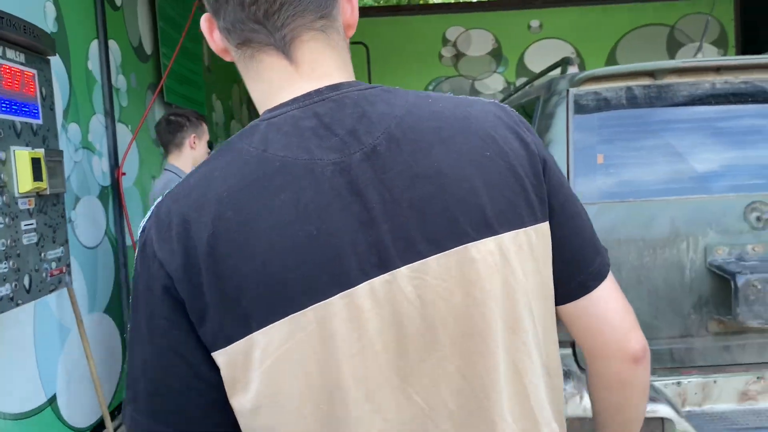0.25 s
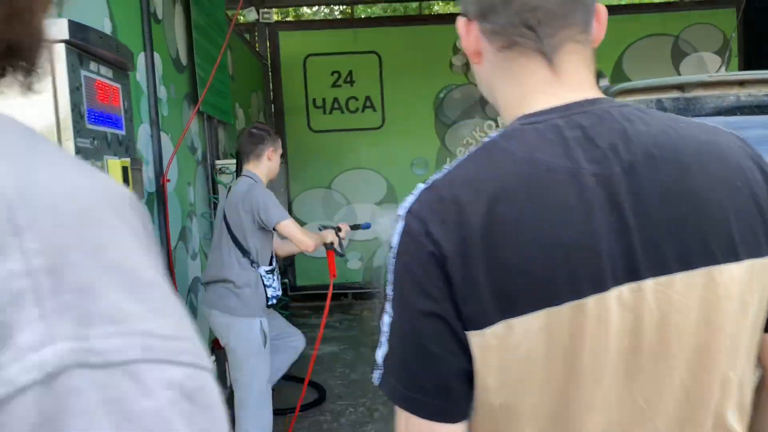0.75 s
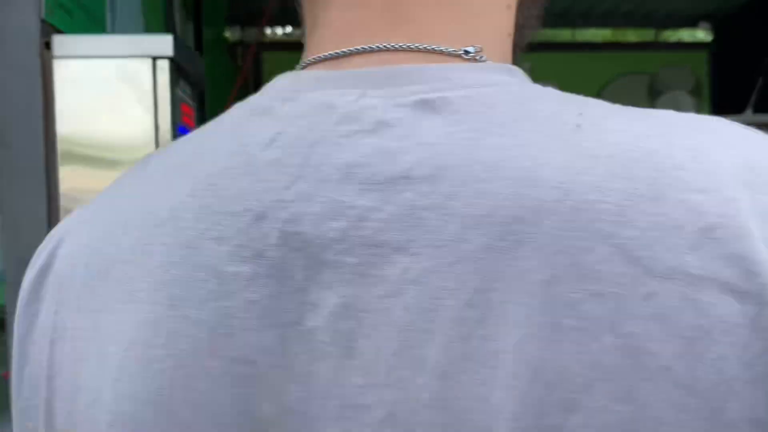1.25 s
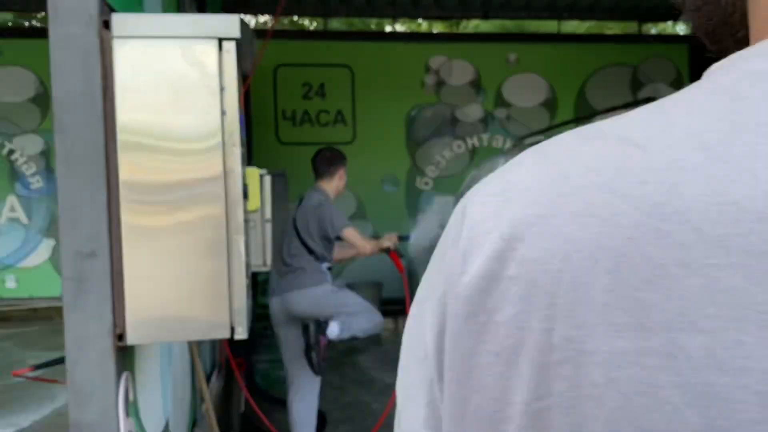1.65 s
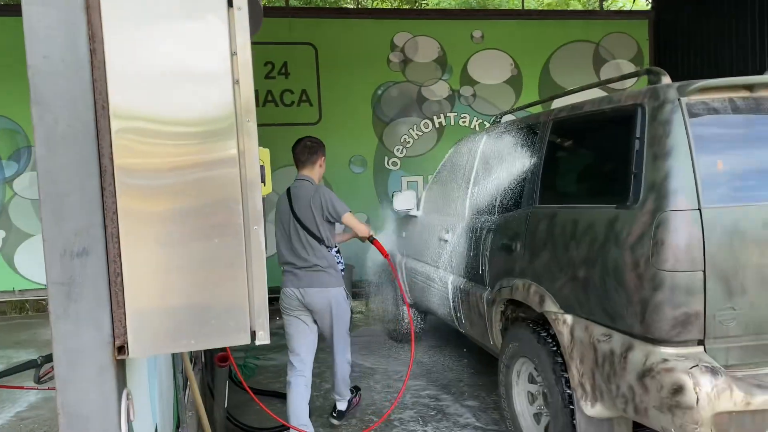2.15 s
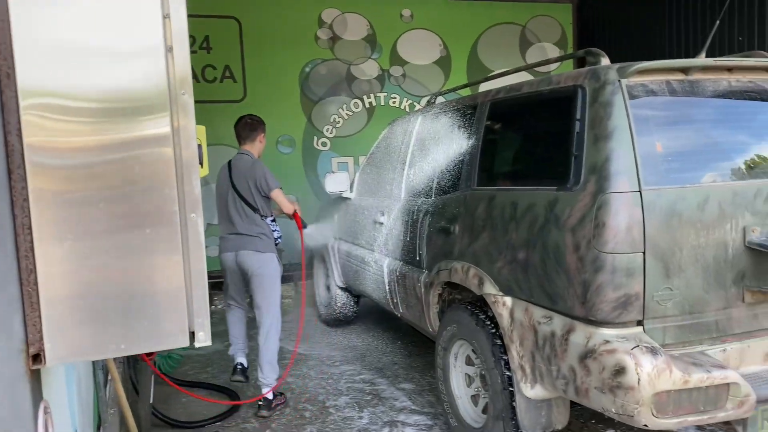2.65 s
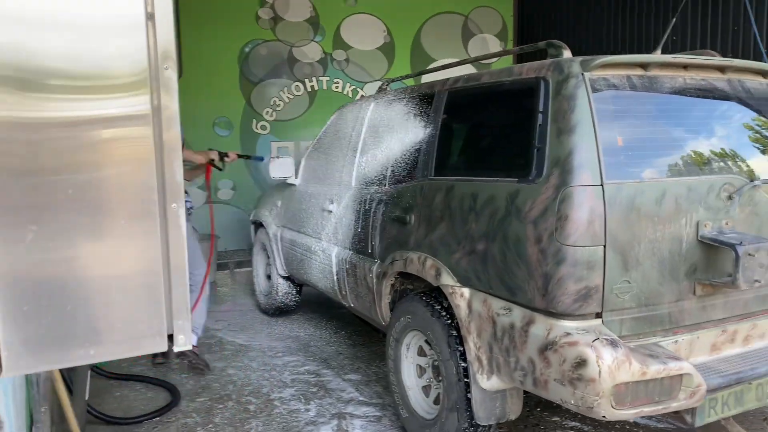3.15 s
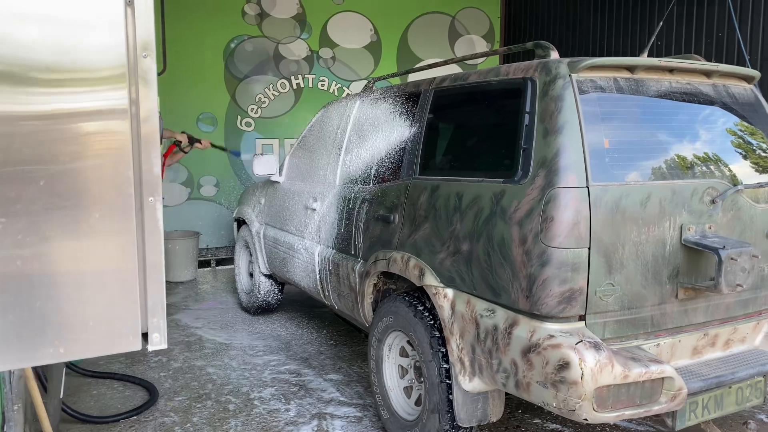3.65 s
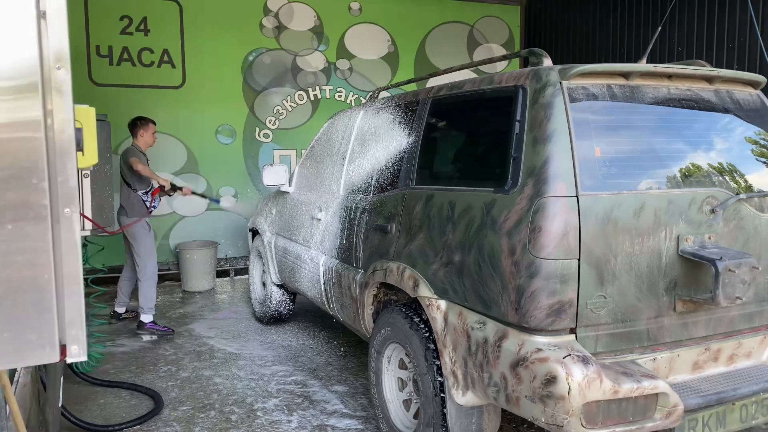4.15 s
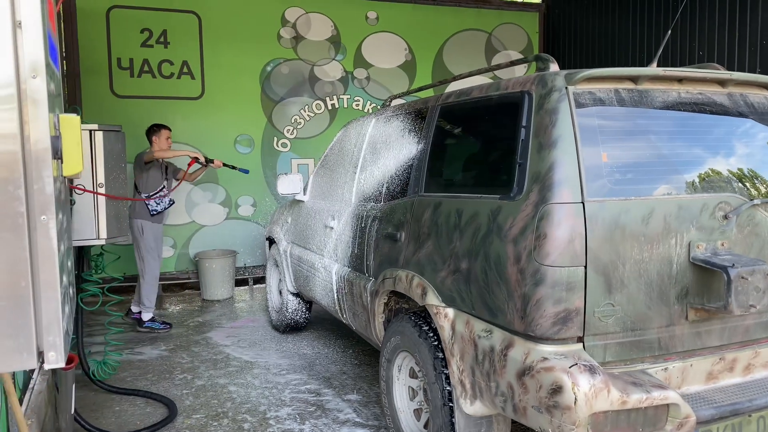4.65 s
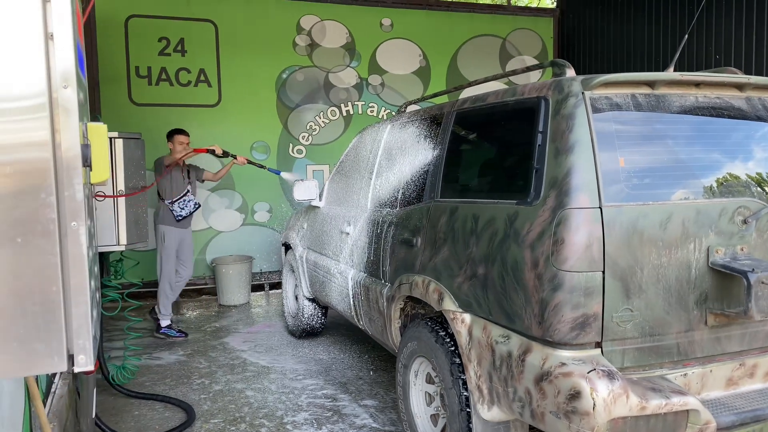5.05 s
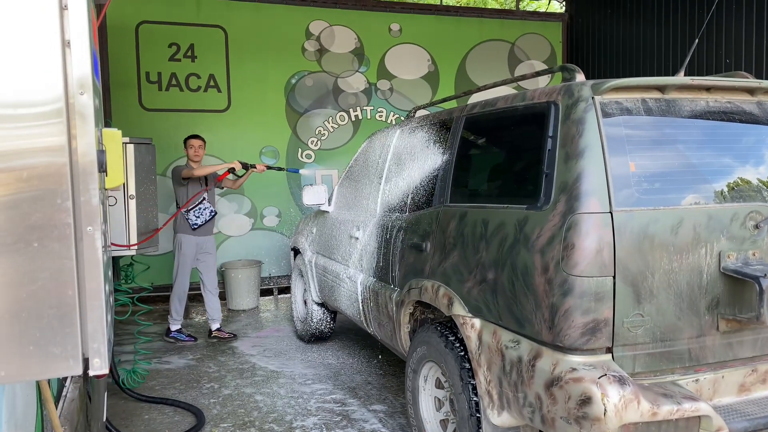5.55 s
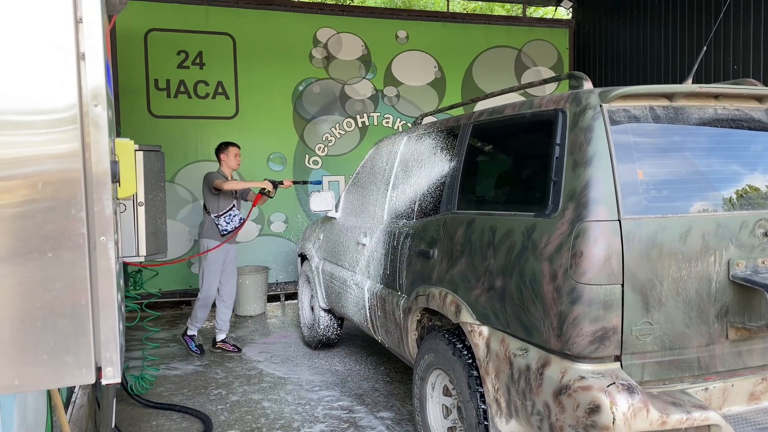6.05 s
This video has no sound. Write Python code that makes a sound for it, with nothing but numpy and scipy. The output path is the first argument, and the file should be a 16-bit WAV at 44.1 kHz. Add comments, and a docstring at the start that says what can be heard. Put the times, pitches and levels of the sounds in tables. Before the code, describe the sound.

Heard from a few metres away in a half-open, reflective wash bay: a pressure lance hisses foam onto bodywork, slightly left, its echoes slowly shifting. Beneath it a pump throbs and knocks rapidly, water rushes low in the hose, and a hollow mid-pitched hoot wobbles. Each trigger release drops to hum, distant airy hiss and little gliding groans before the spray bursts back.

```python
"""A foam lance sprays a car in a self-service wash bay: filtered noise hisses on the left, with shifting echoes.
Dull gliding thuds open the scene; the trigger is let go at 0.76 s, held from 1.13 to 4.5 s and 4.84 to 5.85 s,
and pulled once more at 6.3 s. While it is held, noise drops spatter as foam, resonators hoot as the foam barrel
and shaft harmonics throb and knock as a three-plunger pump. At each release the line groans in short glides,
the pump sags and fades, and the motor's hum stays."""
import sys
import numpy as np
from scipy import signal
from scipy.fft import rfft, irfft
from scipy.io import wavfile

SR = 44100
rng = np.random.default_rng(int(sys.argv[2]) if len(sys.argv) > 2 else 0)


def dump(signal):
    """Clip the signal to [-1, 1] and save it as 16-bit WAV at the path in sys.argv[1]."""
    limited = np.clip(np.atleast_2d(signal).T, -1, 1)
    pcm = np.round(limited * 32767).astype(np.int16)
    wavfile.write(sys.argv[1], SR, pcm)


N = 278712
TIME_S = np.arange(N) / SR
BINS_HZ = np.fft.rfftfreq(N, 1 / SR)

# Motor hum, beating with the plungers' throb: (time [s], lower line [dB], upper line [dB])
HUM_LEVELS = [(0.3, -49, -51), (1.1, -45, -49), (1.65, -45, -40), (3.1, -44, -49), (4.7, -47, -41),
              (5.5, -51, -45), (6.15, -53, -38.5), (6.3, -54, -45)]
# Hum lines: (lower, upper) [multiples of shaft speed]
HUM_LINES = (2, 4)
# Low wash of the surroundings: (frequency [Hz], density [dB per Hz, relative])
WASH_SPECTRUM = [(25, -35), (50, 6), (100, 0), (200, 0), (420, -3.5), (600, -16), (1100, -28), (4500, -60)]
# Low wash, louder around the pauses: (time [s], level [dB])
WASH_LEVELS = [(1.0, -40.5), (3.2, -43.5), (4.75, -37), (5.5, -43), (6.1, -36.5), (6.3, -36.5)]
# Distant hiss outside the bay: (frequency [Hz], density [dB per Hz, relative])
AIR_SPECTRUM = [(300, -11), (700, 0), (1100, -4), (2500, -5), (4500, -12), (8000, -19), (16000, -45)]
# Dull bumps: (start [s], length [s], start pitch [Hz], end pitch [Hz], level [dB])
BUMP_GLIDES = [(0.019, 0.057, 71, 48, -29), (0.1, .12, 58, 57, -33), (0.04, 0.061, 116, 107, -26),
               (0.0068, 0.11, 196.6, 182, -28), (.12, 0.061, 129, 113, -30), (0.087, 0.2, 354, 310, -35.5),
               (.02, 0.091, 400, 303, -32.5), (0.21, 0.085, 115, 112, -39)]

# Trigger pulls: (opens [s], shuts [s], pump unloads [s], lance fill time [s], fade pace [1 = usual],
# spit level [dB], spit decay [s])
TRIGGER_PULLS = [(-1, 0.76, 0.755, 0.01, 0.93, -40, 0.05), (1.133, 4.505, 4.62, 0.078, 1.05, -51, 0.12),
                 (4.838, 5.845, 5.98, 0.008, 0.9, -28, 0.06), (6.307, 7, 7.1, 0.07, 1, -22, 0.045)]
OPENS_S, SHUTS_S, UNLOADS_S, FILL_S, FADE_PACE, SPIT_DB, SPIT_DECAY_S = np.transpose(TRIGGER_PULLS)

# Water rush in hose and lance: (frequency [Hz], density [dB per Hz, relative])
RUSH_SPECTRUM = [(25, -31), (45, -21), (70, 3), (130, -2), (200, 1), (300, 4), (420, 1.5), (600, -3),
                 (900, -2.5), (2000, -30)]
# Water rush: (time [s], level [dB])
RUSH_LEVELS = [(0, -28.5), (0.45, -34.5), (1.6, -36.5), (2.9, -40), (3.6, -36), (4.3, -42.5), (5.6, -34)]
# Left-right difference of jet and water: (frequency [Hz], left above right [dB])
LEFT_EXCESS = [(300, -0.5), (560, 4.5), (1100, 3), (1800, 0.5), (2900, 3), (4400, 5), (7500, 4), (10000, 0)]

# Loaded shaft: (time [s], speed [Hz])
SHAFT_SPEED = [(0, 23.85), (1.6, 23.885), (2.5, 23.87), (4.3, 23.835), (5.5, 23.82)]
# Casing knock: (order [multiple of shaft speed], level [dB, relative])
KNOCK_ORDERS = [(7, -3.5), (8, 3), (9, 2.5), (10, 1), (11, -4.5), (12, -2), (13, -11.5), (14, -9.5),
                (16, -12), (19, -12.5), (22, -13.5)]
# Knock along the way through the bay: (time [s], level [dB], tilt [dB per order], echo blur [rad])
KNOCK_COURSE = [(0.15, -30, -1, 2), (0.45, -34, -0.5, 1.1), (0.68, -31.5, -0.9, 1.5), (1.25, -31, 1, 0.69),
                (1.45, -31.5, -0.5, 0.47), (2.4, -30.5, 0.5, 0.98), (3.1, -31.5, -0.5, 1.1),
                (3.8, -33, 0.5, 1.3), (4.35, -33.5, -0.5, 0.85), (5.1, -34.5, 0.3, 1.3),
                (5.8, -36.5, -0.5, 1.1)]
# Motor drone along standing waves in the bay, one table per line: (time [s], level [dB])
DRONE_LOW_LEVELS = [(0, -34), (0.5, -41.5), (1.7, -40.5), (3.2, -53), (4.3, -45), (5.8, -45)]
DRONE_MID_LEVELS = [(0.1, -48), (0.58, -36.5), (0.8, -48), (1.5, -47), (1.9, -41.5), (2.6, -41), (3.0, -44),
                    (3.8, -43.5), (4.5, -46.5), (5.6, -46.5)]
DRONE_HIGH_LEVELS = [(0.1, -44), (0.45, -42.5), (1.4, -52), (2.4, -51), (3.2, -53), (3.9, -43.5),
                     (4.6, -53.5), (5.8, -46.5)]
# Drone lines: (low, mid, high) [multiples of shaft speed]
DRONE_LINES = (5, 17, 20)

# Line groans under pressure changes: (start [s], length [s], start pitch [Hz], end pitch [Hz], level [dB])
GROAN_GLIDES = [(0.851, 0.2, 428, 408, -45.5), (1.125, .14, 192, 189, -41), (4.501, 0.068, 440, 460, -38.5),
                (4.54, .07, 210, 110, -34), (4.84, 0.13, 190.4, 185, -37), (5.87, 0.13, 660, 640, -43),
                (5.886, 0.046, 436, 462, -40), (5.901, 0.163, 428.4, 408, -35.5),
                (5.988, 0.086, 257, 302, -35), (6.06, .08, 338, 330, -51), (6.081, 0.054, 400, 420, -41),
                (6.11, .11, 511, 464, -43), (6.165, 0.067, 354, 348, -38.5),
                (6.277, 0.087, 430, 414, -37.5), (6.304, 0.032, 1083, 500, -32)]
# Valve spit: (frequency [Hz], density [dB per Hz, relative])
SPIT_SPECTRUM = [(200, -18), (500, -3), (850, 8), (1400, 2.5), (2800, -3), (4500, -1.5), (8000, -9),
                 (16000, -15)]

# Foam spatter: (frequency [Hz], density [dB per Hz, relative])
FOAM_SPECTRUM = [(1500, -18), (4000, -5), (6500, 1.5), (8500, -0.5), (11000, 3), (13000, -0.5), (16000, -7)]
# Foam fan sweeping over a near panel: (middle [s], length [s], boost [dB])
PANEL_SWEEPS = [(1.49, 0.16, 3.5), (1.96, 0.074, 5), (2.992, 0.067, 4), (3.296, 0.1, 9), (3.488, 0.1, 1.5),
                (3.77, 0.09, 9.5), (4.042, 0.16, 7), (4.192, 0.13, 7), (4.368, 0.076, 5.5), (5.07, 0.12, 5),
                (5.8, 0.27, 2.5), (6.09, 0.12, 14)]

# Barrel hoot: (time [s], pitch [Hz], strength [dB; halved for the broad band])
HOOT_COURSE = [(0, 751, 5), (0.16, 702, -2), (0.27, 763, -1.5), (0.48, 693, -1), (0.56, 780, -5),
               (0.75, 764, -5), (1.35, 725, 4), (1.55, 705, 3), (1.69, 745, 5.5), (1.85, 738, -5),
               (2.0, 724, 3), (2.22, 724, 1), (2.32, 704, 1), (2.48, 705, 4.5), (2.6, 755, -5),
               (2.67, 710, -7), (2.75, 720, 6.5), (2.85, 752, -3), (2.97, 732, 2), (3.3, 713, 0),
               (3.55, 717, -1), (4.15, 720, 1.5), (4.5, 705, -0.5), (4.95, 725, -3), (5.2, 716, 0),
               (5.5, 708, -2.5), (5.65, 766, -4), (5.88, 680, -3)]
# Side resonances as the foam thickens: (time [s], lower [dB re hoot], upper [dB re hoot])
SIDE_LEVELS = [(0.1, -13, -18), (0.32, -19, 1), (0.7, -15, -12), (1.4, -17, -15), (1.82, -5.5, -2.5),
               (2.2, -7, -15), (2.7, -15, -20), (3.2, -2.5, -10), (3.6, -10, -16), (4.12, -8, -7),
               (4.4, -13, -16), (5.0, -12, -8), (5.45, -11, -7), (5.8, -3.5, -6)]
# Hoot locked into a whistle: (start [s], length [s], start pitch [Hz], end pitch [Hz], level [dB])
WHISTLE_GLIDES = [(0.29, 0.14, 748, 735, -35), (0.429, 0.075, 720, 720, -29), (1.601, 0.13, 723, 741, -33),
                  (1.949, 0.1, 730, 695, -30), (2.06, 0.097, 719, 723, -29.5), (2.161, 0.14, 737, 744, -33),
                  (2.523, 0.12, 731, 794, -34.5), (2.75, 0.18, 760, 798, -36), (3.063, 0.15, 676, 661, -38),
                  (3.52, 0.076, 740, 722, -34), (4.034, 0.31, 675.5, 670, -38),
                  (4.462, 0.11, 720, 722, -29), (5.462, 0.11, 726, 710, -35), (5.55, 0.096, 695, 646, -39)]

# Jet hiss: (frequency [Hz], density [dB per Hz, relative])
JET_SPECTRUM = [(300, -18.5), (600, -6.5), (950, -7.5), (1250, -9.5), (1550, -7.5), (1850, -10.5),
                (2300, -3.5), (2800, 0), (3400, 1), (4300, -1), (5500, -8.5), (7000, -15), (9000, -58),
                (16000, -16)]
# Lance position, common to jet, spatter and hoot: (time [s], level before each source's offset [dB])
LANCE_LEVELS = [(0.06, -18.5), (0.3, -21.5), (0.375, -24.5), (0.45, -21.5), (0.64, -21), (0.76, -24),
                (1.4, -24), (1.9, -22), (2.38, -20.5), (2.75, -22), (3.8, -22.5), (4.45, -22.5),
                (4.87, -23.5), (5.08, -22.5), (5.35, -23), (5.85, -23.5)]
# Nozzle ring, sinking as the lance is carried forward: (time [s], frequency [Hz])
NOZZLE_RING = [(0, 2990), (1.6, 3040), (2.4, 2800), (2.65, 2990), (3.2, 2690), (4.3, 2680), (5.0, 2640),
               (5.9, 2780)]
# Bay reverberation: (frequency [Hz], density [dB per Hz, relative])
BAY_SPECTRUM = [(300, -6), (600, -2.5), (1100, 2), (1700, -3.5), (3000, 0.5), (4500, -8.5), (7000, -13.5),
                (12000, -38), (16000, -40)]

# Fall rates hold at fade pace 1; rises are time constants.
AIR_DB = -50.5
RUSH_RISE_S, RUSH_FALL_DB_PER_S, GUSH_DB, GUSH_S = 0.01, 73, 2, 0.14
SAG_HZ, SAG_S, SAG_LAG_S = 2, 0.1561, 0.078
KNOCK_S, THROB_LAG_TURNS = 1.467, 0.28  # moment of one knock; throb peaks this much later
THROB_DB, THROB_RISE_S, THROB_FALL_DB_PER_S = -32.5, 0.069, 140
SURGE_DB, SURGE_S = 2.5, 0.099
KNOCK_RISE_S, KNOCK_FALL_DB_PER_S = 0.045, 76
# Offsets from the lance level; spatter and hoot lag as multiples of the fill time
SPATTER_DB, SPATTER_LAG, SPATTER_FALL_DB_PER_S = -12, 1.24, 172
HOOT_DB, HOOT_LAG, HOOT_FALL_DB_PER_S = -9, 1.8, 97
JET_DB, JET_FALL_DB_PER_S = -0.5, 120
BAY_DB, BAY_FALL_DB_PER_S = -16, 52
UNDERTONE_HZ, UNDERTONE_WIDTH_HZ = 669, 46
OVERTONE_HZ, OVERTONE_WIDTH_HZ = 826, 100
EDGE_HZ = 15900


def gain_of(db):
    """Decibels to amplitude."""
    return 10 ** (np.asarray(db) / 20)


def evened(x):
    """Scales to rms 1."""
    return x / np.sqrt(np.mean(x ** 2) + 1e-20)


def noise(channels=None):
    """White Gaussian noise, mono by default."""
    return rng.standard_normal(N if channels is None else (channels, N))


def curves(rows):
    """Table columns, interpolated linearly in time."""
    time_s, *columns = np.transpose(rows)
    return [np.interp(TIME_S, time_s, column) for column in columns]


def spectrum_db(rows):
    """Spectrum table, interpolated in dB over log frequency."""
    hz, db = np.transpose(rows)
    return np.interp(np.log(BINS_HZ + 1), np.log(hz), db)


def coloured(x, spectrum):
    """Filters x by a spectrum, at rms 1."""
    return evened(irfft(rfft(x) * gain_of(spectrum_db(spectrum)), N))


def drift(rate_hz):
    """Low-passed noise for slow random changes, rms 1."""
    return evened(irfft(rfft(noise()) / (1 + (BINS_HZ / rate_hz) ** 2), N))


def resonate(x, hz, width_hz):
    """Double-pole resonance following hz, at rms 1."""
    turn = np.exp(2j * np.pi * np.cumsum(hz * np.ones(N)) / SR)
    radius = np.exp(-np.pi * width_hz / SR)
    lowered = x / turn  # shifts the resonance to 0 Hz
    filtered = signal.lfilter([1], [1, -2 * radius, radius * radius], lowered)
    return evened((turn * filtered).real)


def ports(direct, wet, lead_ms=0):
    """Stereo: direct sound leads on the left by lead_ms; power share wet is diffuse wall sound."""
    late = irfft(rfft(direct) * np.exp(-2j * np.pi * BINS_HZ * lead_ms / 1000), N)
    wet = np.clip(wet, 0, 1)
    diffuse = noise(2)
    return np.sqrt(1 - wet) * evened(np.array([direct, late])) + np.sqrt(wet) * diffuse


def panned(x, left_db):
    """Raises left over right by a number of dB or by a spectrum."""
    if np.ndim(left_db):
        left_db = spectrum_db(left_db)
    return irfft(rfft(x) * gain_of(left_db * np.array([[.5], [-.5]])), N)


def swell(middle_s, length_s):
    """Gaussian hump of height 1 and half-height width length_s."""
    return .5 ** ((2 * (TIME_S - middle_s) / length_s) ** 2)


def held(rise_s, ends_s, fall_db_per_s):
    """Gain that builds up at each trigger pull, holds to its end, then decays exponentially."""
    since_s = np.maximum(TIME_S[:, None] - OPENS_S, 0)
    after_s = np.maximum(TIME_S[:, None] - ends_s, 0)
    build_up = (1 - np.exp(-since_s / rise_s)) ** 2
    return (build_up * gain_of(-fall_db_per_s * FADE_PACE * after_s)).max(axis=1)


def tone(start_s, length_s, start_hz, end_hz, db, waver=0.0071):
    """Short, unsteady sine glide under a half-sine envelope."""
    t = np.arange(0, length_s, 1 / SR)
    wander = np.interp(t, np.linspace(0, length_s, 8), rng.standard_normal(8))
    hz = np.interp(t, [0, length_s], [start_hz, end_hz]) * (1 + waver * wander)
    envelope = np.sin(np.pi * t / length_s)
    sound = envelope * np.sqrt(2) * np.sin(2 * np.pi * np.cumsum(hz) / SR)
    return gain_of(db) * np.interp(TIME_S, start_s + t, sound, left=0, right=0)


def shaft(sag_hz=0):
    """Shaft angle [rad], zero at KNOCK_S; speed sags by sag_hz against the shut valve."""
    stalls = sum(swell(s + SAG_LAG_S, SAG_S) for s in UNLOADS_S)
    turns = np.cumsum(curves(SHAFT_SPEED)[0] - sag_hz * stalls) / SR
    return 2 * np.pi * (turns - np.interp(KNOCK_S, TIME_S, turns))


def yard():
    """Unbroken motor hum as two shaft harmonics, plus noise for the low wash and distant hiss."""
    angle = shaft() - 2 * np.pi * THROB_LAG_TURNS
    hum = sum(gain_of(db) * evened(np.cos(k * angle)) for k, db in zip(HUM_LINES, curves(HUM_LEVELS)))
    air_gain = gain_of(AIR_DB + 0.75 * drift(rate_hz=17))
    air = air_gain * coloured(ports(noise(), wet=1.0), AIR_SPECTRUM)
    wash = gain_of(curves(WASH_LEVELS)[0]) * coloured(ports(noise(), wet=0.23), WASH_SPECTRUM)
    return hum + air + wash


def bump():
    """Dull, brief thuds as unsteady low glides."""
    return sum(tone(*row, waver=0.051) for row in BUMP_GLIDES)


def roar():
    """Low water rush in hose and lance, drumming on the doors; gushes as flow starts or stops."""
    rush = panned(coloured(ports(noise(), wet=0.42), RUSH_SPECTRUM), LEFT_EXCESS)
    gush_times_s = [*(OPENS_S + FILL_S), *(UNLOADS_S - GUSH_S / 2)]
    gushes = sum(swell(s, GUSH_S) for s in gush_times_s)
    level_db = curves(RUSH_LEVELS)[0] + GUSH_DB * gushes
    return rush * gain_of(level_db) * held(RUSH_RISE_S, UNLOADS_S, RUSH_FALL_DB_PER_S)


def plunger_throb(angle):
    """Three strokes a turn; swells against the shut valve around unloading."""
    strokes = np.cos(3 * (angle - 2 * np.pi * THROB_LAG_TURNS))
    surge = sum(swell(s, SURGE_S) for s in UNLOADS_S)
    level = gain_of(THROB_DB + SURGE_DB * surge)
    return evened(strokes) * level * held(THROB_RISE_S, UNLOADS_S, THROB_FALL_DB_PER_S)


def casing_knock(angle, dispersion_rad=0.2396, wander_db=1.07):
    """One knock a turn from shaft harmonics, spread in time by pipes and shifting echoes."""
    level_db, tilt_db, blur_rad = curves(KNOCK_COURSE)
    knock = 0
    for k, order_db in KNOCK_ORDERS:
        above = np.clip(k - 9, -4, 4)
        lag_rad = dispersion_rad * (k - 9) ** 2 + blur_rad * drift(rate_hz=0.2)
        gain = gain_of(order_db + tilt_db * above + wander_db * drift(rate_hz=1.5))
        knock = knock + gain * np.cos(k * angle - lag_rad)
    return evened(knock) * gain_of(level_db)


def motor_drone(angle):
    """Three shaft harmonics, each swelling and fading along standing waves."""
    drone = 0
    for k, levels in zip(DRONE_LINES, (DRONE_LOW_LEVELS, DRONE_MID_LEVELS, DRONE_HIGH_LEVELS)):
        line = evened(np.cos(k * angle + rng.uniform(0, 2 * np.pi)))
        drone = drone + gain_of(curves(levels)[0]) * line
    return drone


def pump(slack_rad=0.002):
    """Throb, knock and drone off one shaft; drive slack smears the high orders."""
    load = held(KNOCK_RISE_S, UNLOADS_S, KNOCK_FALL_DB_PER_S)
    angle = shaft(SAG_HZ) + slack_rad * drift(rate_hz=12)
    return plunger_throb(angle) + (casing_knock(angle) + motor_drone(angle)) * load


def valve():
    """Decaying noise spit at each trigger opening, and short gliding groans of the line."""
    bursts = 0
    for s, db, decay_s in zip(OPENS_S, SPIT_DB, SPIT_DECAY_S):
        attack = np.clip((TIME_S - s) / 0.0043, 0, 1)
        bursts = bursts + gain_of(db) * attack * np.exp(-abs(TIME_S - s) / decay_s)
    spits = bursts * coloured(ports(noise(), wet=0.84, lead_ms=0.51), SPIT_SPECTRUM)
    return panned(spits, left_db=3.5) + sum(tone(*row) for row in GROAN_GLIDES)


def spatter(lance_db, drops_per_s=14000):
    """Foam drops burst on bodywork: random impulses, lagging the jet and harder on near panels."""
    sizes = gain_of(2.0 * np.minimum(rng.exponential(1, N), 5)) * rng.choice([-1, 1], N)
    drops = sizes * (rng.random(N) < drops_per_s / SR)
    fizz = coloured(ports(drops, wet=0.045, lead_ms=-0.2737), FOAM_SPECTRUM)
    sweep_db = sum(db * swell(s, length_s) for s, length_s, db in PANEL_SWEEPS)
    level_db = lance_db + SPATTER_DB + sweep_db + 1.66 * drift(rate_hz=10.0)
    return fizz * gain_of(level_db) * held(SPATTER_LAG * FILL_S, SHUTS_S, SPATTER_FALL_DB_PER_S)


def barrel(lance_db, steadiness=0.16, gurgle_db=2):
    """Drawn-in air rings the foam barrel: a wavering hoot between two fuzzy side resonances."""
    hz, strength_db = curves(HOOT_COURSE)
    under_db, over_db = curves(SIDE_LEVELS)
    broad = resonate(ports(noise(), wet=0.83, lead_ms=0.5), hz, width_hz=163)
    under = resonate(ports(noise(), wet=0.63, lead_ms=0.88), UNDERTONE_HZ, UNDERTONE_WIDTH_HZ)
    over_hz = OVERTONE_HZ * (1 + 0.028 * drift(rate_hz=5.3))
    over = resonate(ports(noise(), wet=0.45, lead_ms=0.54), over_hz, OVERTONE_WIDTH_HZ)
    narrow_hz = hz * (1 + 0.018 * drift(rate_hz=5.4))
    narrow = signal.hilbert(resonate(ports(noise(), wet=0.25, lead_ms=0.2), narrow_hz, width_hz=35))
    narrow = evened(narrow.real / (abs(narrow) + 0.1) ** steadiness)  # partly levelled envelope
    hoot = gain_of(-5.0 + strength_db / 2) * broad + gain_of(-7.0 + strength_db) * narrow
    ring = hoot + gain_of(under_db) * under + gain_of(over_db) * over
    flow = gain_of(lance_db + HOOT_DB) * held(HOOT_LAG * FILL_S, SHUTS_S, HOOT_FALL_DB_PER_S)
    whistles = sum(tone(*row, waver=0.0085) for row in WHISTLE_GLIDES)
    whistles = whistles * gain_of(gurgle_db * drift(rate_hz=41))
    return panned(ring * flow + whistles, left_db=6.5)


def echoed(x, count=16, nearest_ms=2.5, spread_ms=7, sway_ms=0.094, walk_ms_per_s=0.3428):
    """Reflections off car, floor and walls: shifting delays comb x into drifting streaks."""
    fine = signal.resample(x, 4 * N)  # for quarter-sample delays
    out = 0
    for k, (place, heading, sway, sign) in enumerate(rng.random((count, 4))):
        delay_ms = nearest_ms + spread_ms * (k + place) / count
        walk = walk_ms_per_s * (2 * heading - 1) * TIME_S
        shift_ms = walk + sway_ms * np.sin(np.pi * (TIME_S + 2 * sway))
        arrival = np.rint(4 * SR * (TIME_S - (delay_ms + shift_ms) / 1000)).astype(int) % len(fine)
        out = out + np.sign(sign - .5) * fine[arrival]
    return evened(out)


def jet(lance_db, echo_db=0, ring_db=-7):
    """Nozzle turbulence fluttering as air and soap mix unevenly; bay reverberation outlasts it."""
    turbulence = noise()
    echoes = np.array([echoed(turbulence), echoed(turbulence)])
    heard = ports(turbulence, wet=0.66, lead_ms=0.483) + gain_of(echo_db) * echoes
    ring = resonate(noise(2), curves(NOZZLE_RING)[0], width_hz=560)
    hiss = evened(coloured(heard, JET_SPECTRUM) + gain_of(ring_db) * ring)
    level_db = lance_db + JET_DB + 0.67 * drift(rate_hz=11.0)
    flow = held(FILL_S, SHUTS_S, JET_FALL_DB_PER_S)
    # slight random unevenness of the hiss as it rises and fades
    unevenness_db = 1.1 * drift(rate_hz=13) * (1 - flow)
    tail_gain = gain_of(lance_db + BAY_DB) * held(FILL_S, SHUTS_S, BAY_FALL_DB_PER_S)
    tail = coloured(noise(2), BAY_SPECTRUM) * tail_gain
    return panned(hiss, LEFT_EXCESS) * gain_of(level_db + unevenness_db) * flow + tail


def scene():
    """Sums surroundings, pump and lance."""
    lance_db = curves(LANCE_LEVELS)[0]
    background = yard() + bump() + roar() + pump()
    lance = valve() + spatter(lance_db) + barrel(lance_db) + jet(lance_db)
    return background + lance


def record(dry):
    """Low-pass band limit at EDGE_HZ."""
    low_pass = signal.firwin(511, EDGE_HZ, window=("kaiser", 9), fs=SR)
    return signal.oaconvolve(dry, low_pass[None], "same")


dry = scene()
out = record(dry)
dump(out)
```